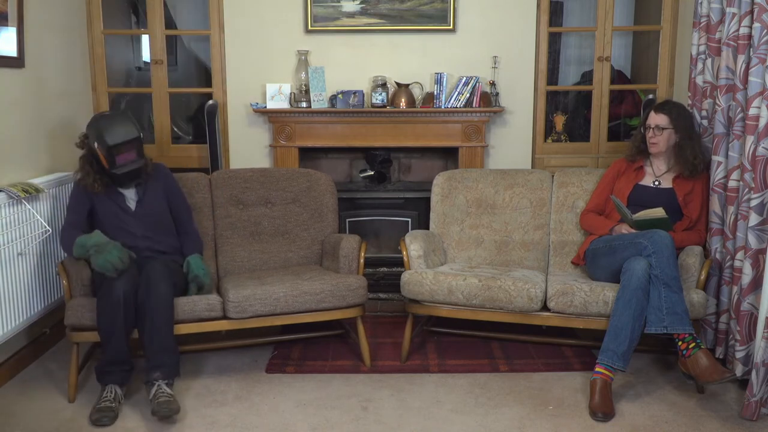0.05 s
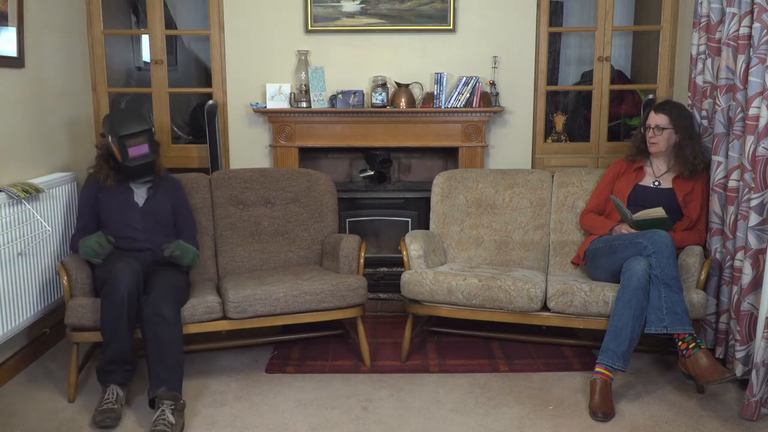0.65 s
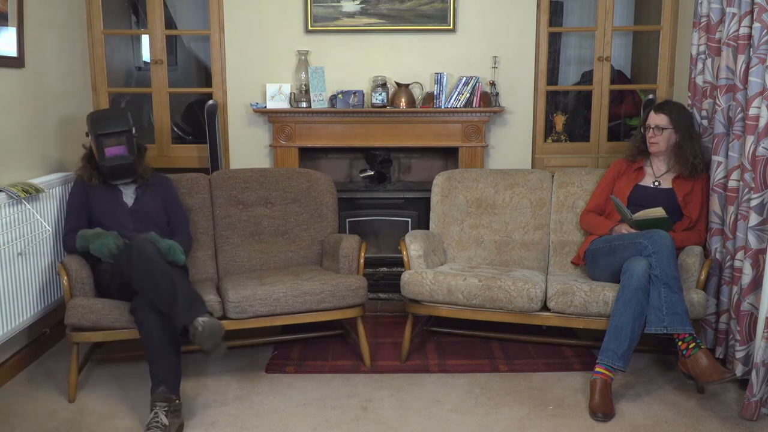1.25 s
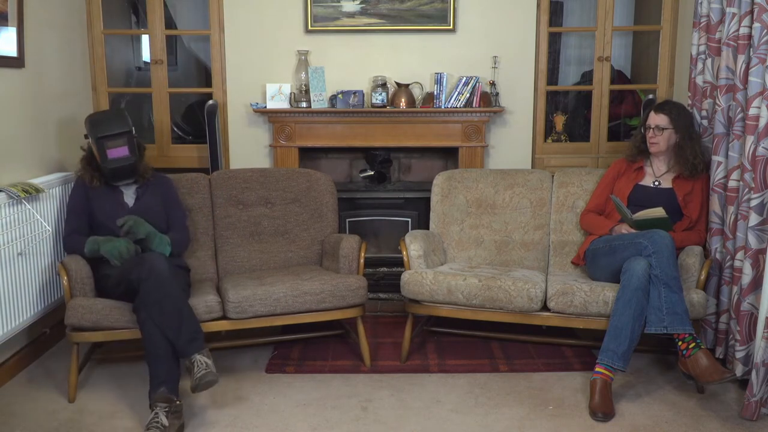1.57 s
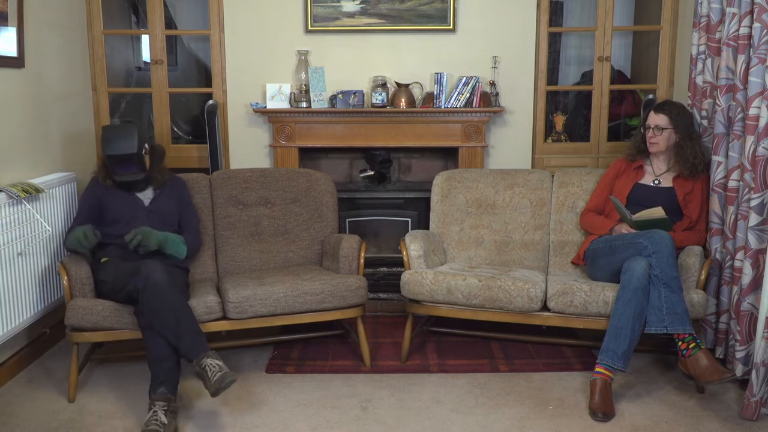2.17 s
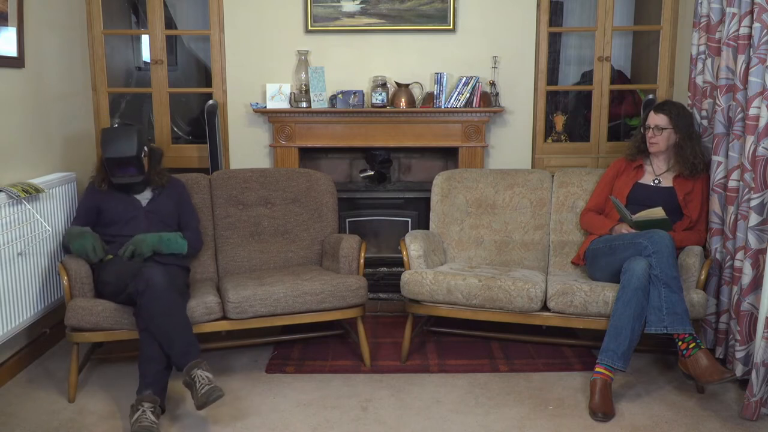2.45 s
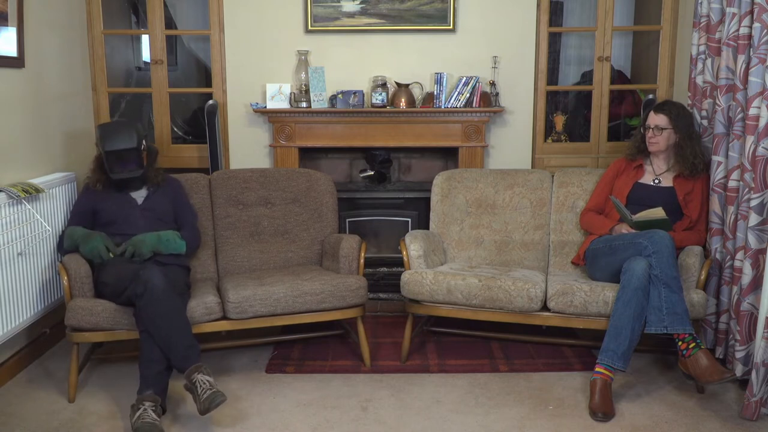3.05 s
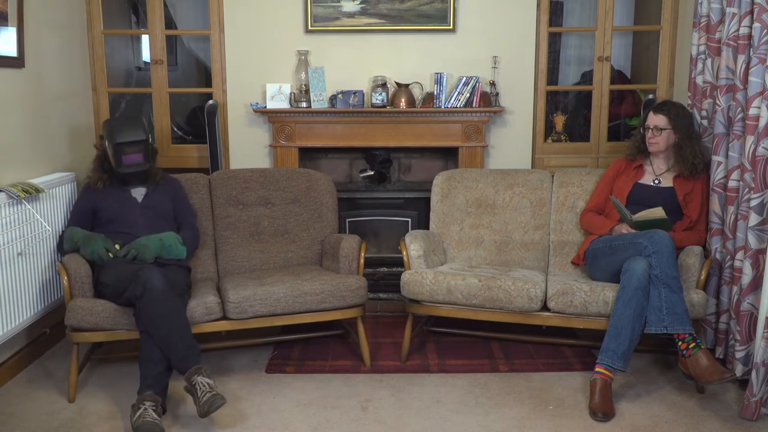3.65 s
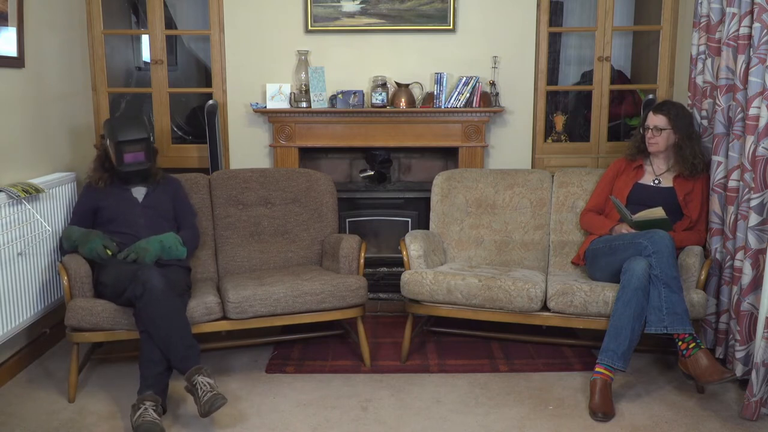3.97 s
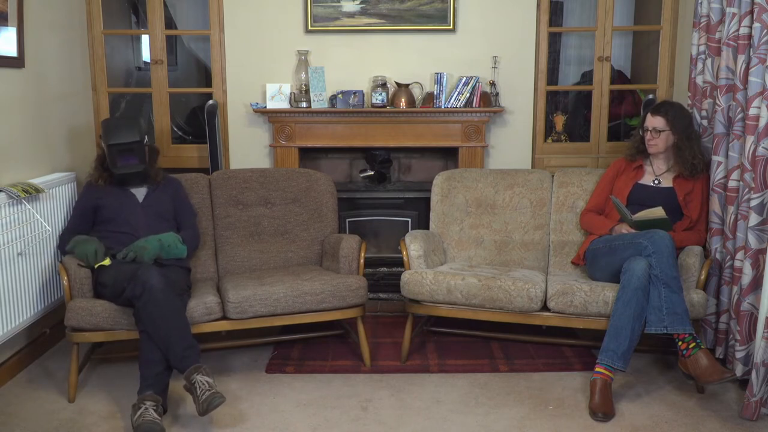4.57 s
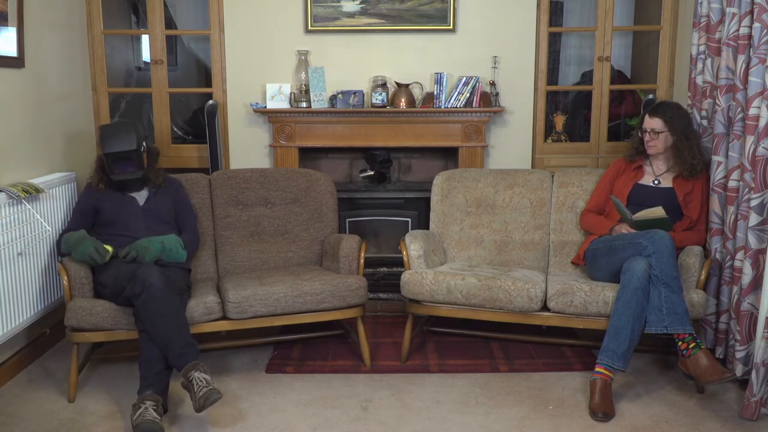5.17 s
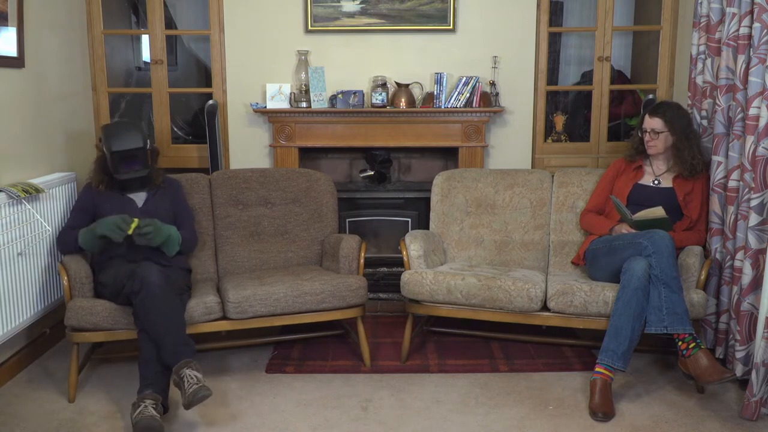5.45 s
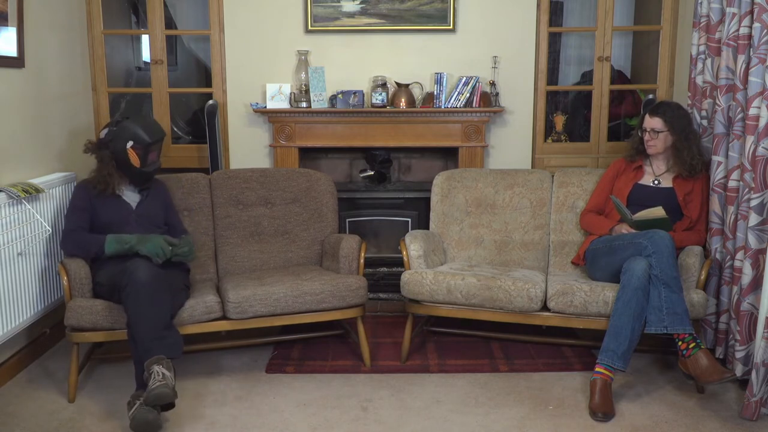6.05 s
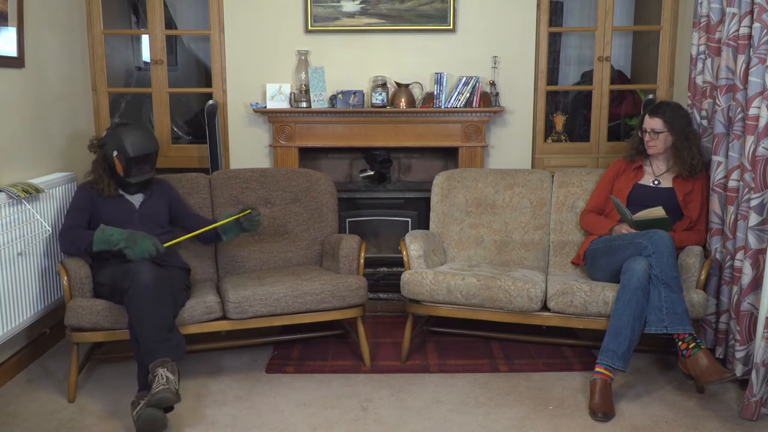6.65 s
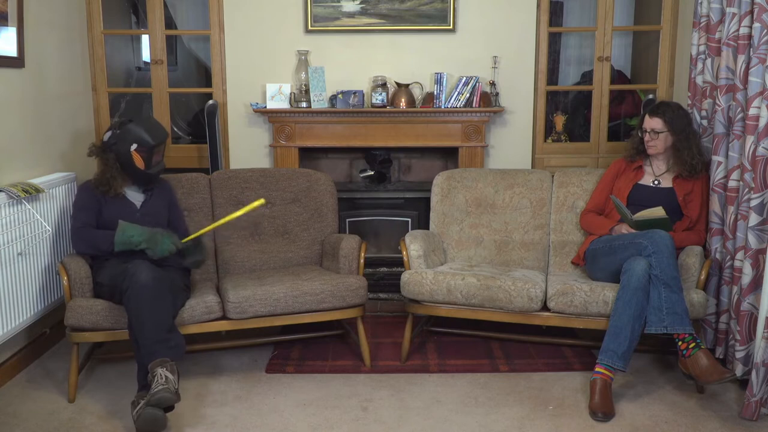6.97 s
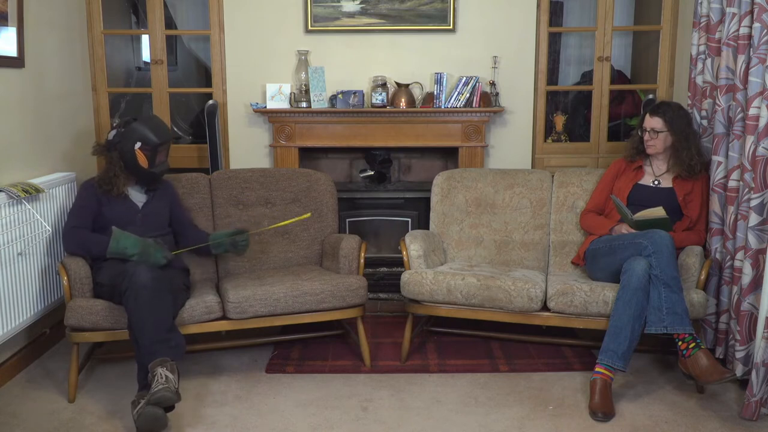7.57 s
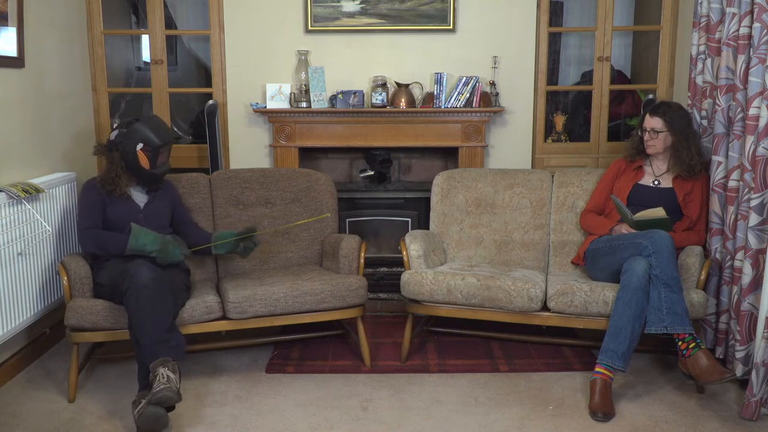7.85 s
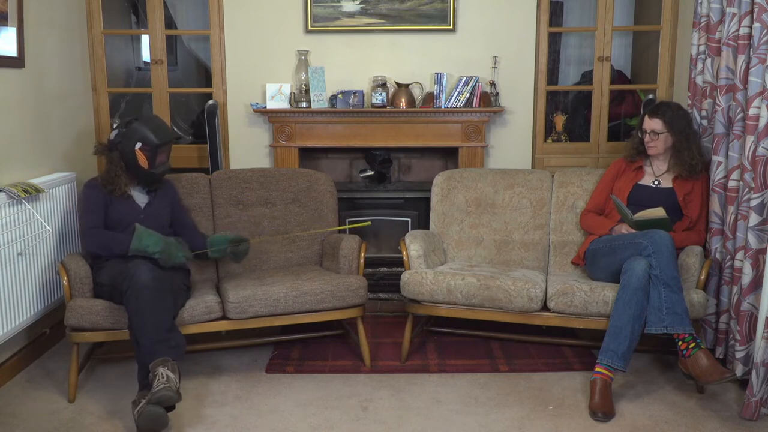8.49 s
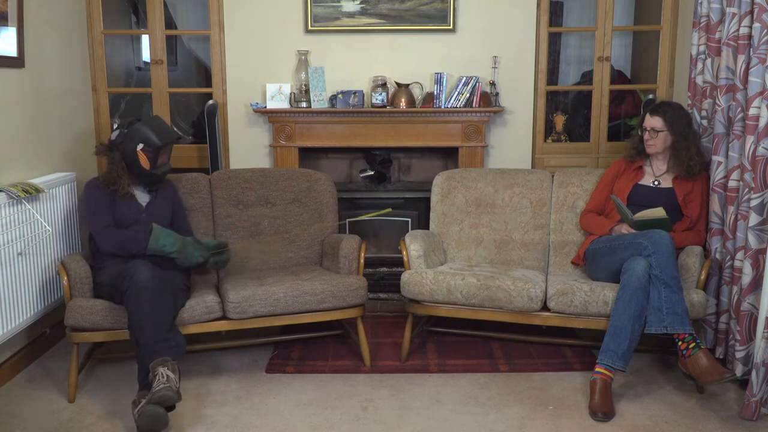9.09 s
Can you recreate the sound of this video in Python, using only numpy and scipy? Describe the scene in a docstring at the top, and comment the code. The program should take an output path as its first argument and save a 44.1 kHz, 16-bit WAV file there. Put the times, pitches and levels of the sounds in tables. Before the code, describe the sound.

Clothes swish softly as someone shifts on a sofa, and trouser legs slide over each other at about 1 second. From 2 seconds, thick leather gloves rub and creak on a tape measure, with padded bumps and light, hollow knocks of its case. At about 4.4 and 4.6 seconds the case clacks sharply twice, the first clack being the loudest sound. Smaller clicks, rubs and rustles follow. The steel blade then rasps through its slot in three short pulls, at roughly 6.3, 7.4 and 8.5 seconds, the first strongest and the last a little higher in pitch. From 6.7 seconds until just after 9, the extended blade gives bright, thin crinkles and ticks as it sags and buckles. The handling is on the right, with only a trace on the left. The living room is quiet, with faint steady hiss and little echo.

```python
"""A quiet living room: someone in thick gloves shifts on a sofa and fumbles with a tape measure.
Cloth swishes, leather sticks and slips, hands and legs bump. The hollow case knocks and clacks
twice, loudly. Then the steel blade rasps through its slot in three pulls, crinkling as it sags
and buckles. The handling is on the right; the left has faint room noise and a trace of it."""
import sys
import numpy as np
from scipy import signal
from scipy.fft import rfft, irfft
from scipy.io import wavfile
from scipy.ndimage import uniform_filter1d

SR = 44100
rng = np.random.default_rng(int(sys.argv[2]) if len(sys.argv) > 2 else 0)


def dump(signal):
    """Clip the signal to [-1, 1] and save it as 16-bit WAV at the path in sys.argv[1]."""
    limited = np.clip(np.atleast_2d(signal).T, -1, 1)
    pcm = np.round(limited * 32767).astype(np.int16)
    wavfile.write(sys.argv[1], SR, pcm)


N = 411012
TIME_S = np.arange(N) / SR

# Levels are relative: each source adds its own gain.
# noise floor spectra: f/Hz, gain/dB
LEFT_FLOOR = [(20, 3), (120, -1.5), (400, -2), (1000, -8), (4000, -15.5), (15000, -16)]
RIGHT_FLOOR = [(20, -9), (100, -1), (200, -4.5), (500, -2), (1400, -12), (3000, -12), (8000, -14),
               (15000, -17.5)]
# sleeve and trouser moves: t/s, rise/s, fall/s, level/dB, brightness/dB
SWISHES = [(0, .01, .11, -50, -1), (.02, .1, .35, -56, 1.5), (.2, .3, .5, -58, 3),
           (.72, .18, .22, -52, 2.5), (.92, .22, .27, -51, 6), (1.3, .12, .15, -58.5, 4),
           (.53, .07, .12, -55.5, 0), (1.5, .14, .42, -60, 3), (1.93, 0.2, 0.58, -56, 1.5),
           (2.9, 0.2, 0.13, -58.5, 6), (3.3, 0.27, 0.36, -68.5, 10.5), (3.84, 0.18, 0.25, -63, 11),
           (4.62, 0.21, 0.3, -59, 8), (4.98, 0.21, 0.45, -59.5, 5), (5.45, 0.42, .34, -55, 3),
           (6.03, 0.11, 0.49, -52.5, 5)]
# friction spectra of fabric, leather, blade in slot: f/Hz, gain/dB
CLOTH_COLOUR = [(100, -8), (200, -3.5), (320, 2.5), (700, 4), (1400, 1.5), (3000, -4), (6000, -7.5),
                (9000, -11), (15000, -24)]
GRIP_COLOUR = [(120, -24), (220, -10), (330, 6), (450, -7.5), (600, -2), (800, -8), (1050, -7), (1350, -1),
               (1800, -17), (4000, -19), (15000, -26)]
PULL_COLOUR = [(200, -20), (600, -11), (950, -9.5), (1300, -4.5), (1900, -4.5), (3100, -2.5), (4300, -2.5),
               (6500, -7), (8400, -8.5), (11000, -14.5), (15000, -26)]
# constant glove creak, fading once one hand lets go: t/s, level/dB
HOLD_CREAK = [(0, -70), (6.4, -66), (6.7, -69.5), (9.32, -79.5)]
# glove slides on the case: t/s, rise/s, fall/s, level/dB, crackle/dB
RUBS = [(0.83, 0.058, 0.11, -55, -68), (1.947, 0.026, 0.038, -49.5, -54), (2.445, 0.074, 0.067, -50.5, -55),
        (2.63, 0.16, 0.088, -63, -54.5), (3.56, 0.073, 0.033, -52, -51.5), (3.94, 0.065, 0.16, -55, -59),
        (4.849, 0.032, 0.049, -59, -47.5), (5.19, 0.064, 0.12, -58, -70), (5.071, 0.059, 0.037, -57.5, -56),
        (5.559, 0.035, 0.051, -52, -56)]
# spectrum of steel ticks: f/Hz, gain/dB
STEEL_COLOUR = [(150, -30), (500, -10.5), (2000, -8), (4500, -2), (7000, -1), (8600, -1), (10400, -4.5),
                (13500, -7), (15500, -15.5)]
# legs crossing: t/s, rise/s, fall/s, level/dB
LEG_SLIDE = (.88, .19, .16, -60)
# note of the trouser weave: t/s, f/Hz
WEAVE_PITCH = [(.93, 830), (1.07, 1130), (1.15, 1950)]
# hands and legs on case, lap and sofa: t/s, level/dB, f/Hz
BUMPS = [(1.056, -47, 368), (1.446, -47.5, 380), (1.988, -43, 343), (2.487, -39.5, 1360),
         (2.799, -42.5, 766), (3.034, -42, 1270), (3.404, -42, 345), (4.917, -40, 362), (5.271, -40, 375),
         (5.35, -44.5, 630), (6.03, -38, 377), (6.089, -44, 1010), (6.131, -42.5, 1315), (6.175, -40, 556),
         (6.431, -45, 1380), (7.156, -52.5, 571), (7.276, -48, 566), (7.498, -45, 335), (7.879, -48.5, 410)]
# case contacts: t/s, thud/dB, snap/dB, tink/dB, base decay/s
KNOCKS = [(1.927,-47.5,-55.5,-72,0.0045),(1.9752,-49,-49,-55,0.01),(2.185,-46,-53,-55.5,0.0042),(2.54,-44.5,-64,-61,0.012),(2.565,-49,-51,-58,0.004),(2.814,-47,-52.5,-54,0.0024),(3.032,-53,-56,-61,0.013),(3.404,-57,-46.5,-53.5,0.0031),(3.432,-55.5,-52,-58,0.0015),(4.0428,-43,-52,-63,0.0011),(4.098,-57,-38,-44,0.0028),(4.3578,-35.5,-35,-37,0.017),(4.3882,-39,-36,-41.5,0.0049),(4.414,-37,-47,-66,0.0046),(4.4292,-30,-29,-29,0.0012),(4.4315,-23.5,-21,-14,0.00059),(4.4322,-25,-13.5,-19.5,0.0013),(4.55,-39.5,-36,-49,0.005),(4.5576,-33,-35,-39,0.023),(4.58,-26,-22,-25.5,0.0034),(4.592,-35,-34,-50,0.0035),(4.614,-46,-43,-63,0.0028),(4.674,-44,-62,-70,0.002),(4.819,-49,-49.5,-56,0.02),(4.886,-47.5,-62,-40.5,0.0037),(4.941,-56,-44.5,-69,0.0057),(4.946,-39.5,-48,-58,0.001),(5.274,-51.5,-67,-67,0.0018),(5.4934,-45,-50,-58,0.0032),(5.4983,-56,-49.5,-67,0.0036),(5.5956,-46,-43,-52,0.017),(5.6091,-49,-39,-51,0.0046),(6.0307,-51.5,-42.5,-43.5,0.0023),(6.2065,-58,-44,-47.5,0.0037),(6.2888,-49,-33.5,-40.5,0.0027),(7.2658,-49.5,-41,-51,0.0026),(8.2696,-49,-33,-35.5,0.00071)]
# spectra of a contact's three parts: f/Hz, gain/dB
THUD_COLOUR = [(70, -22.5), (210, -17), (340, -3), (450, -4.5), (590, -2.5), (850, -4.5), (1300, -5),
               (1800, -12.5), (4000, -44)]
SNAP_COLOUR = [(200, -49.5), (600, -25), (1200, -7), (1650, -4), (2900, -0.5), (4200, -0.5), (5200, -1.5),
               (6200, -8), (8000, -30.5)]
TINK_COLOUR = [(3500, -37), (6200, -4), (8500, 4), (10500, -5), (13000, -5), (16000, -17.5)]
# resonances of case and coil: f/Hz, width/Hz, gain/dB
CASE_MODES = [(1360, 130, 4), (2700, 290, 2.5), (3200, 280, -1.5), (5300, 350, -6), (8400, 180, -0.5)]
# contacts that ring the case: t/s, level/dB, f/Hz, decay/s
PINGS = [(2.541, -45, 616, .019), (4.097, -42, 3130, .004), (6.0315, -44, 4020, .0016),
         (4.4316, -14.5, 3000, .0012), (4.436, -31, 578, .012), (4.5795, -31, 3980, .002),
         (4.586, -34, 780, .005), (8.2692, -47, 563, .011)]
# tugs making up the three pulls: t/s, rise/s, fall/s, level/dB
TUGS = [(6.03, .35, .1, -48.5), (6.23, .072, .086, -54), (6.35, .095, .11, -39), (6.424, .009, .016, -38.5),
        (7.3, .13, .1, -45.5), (7.43, .055, .1, -44.5), (7.55, .045, .25, -54.5), (8.33, .18, .15, -47),
        (8.55, .074, .1, -54)]
# coil rasp, rising as the case empties: t/s, f/Hz
RASP_PITCH = [(6.45, 3200), (7.49, 3400), (8.6, 4730)]
# buckles of the free blade: t/s, level/dB, decay/s, ring f/Hz
FLICKS = [(6.7428, -33.5, .0045, 8560), (6.7836, -44.5, .014, 8940), (6.8697, -38, .005, 9400),
          (7.0484, -54, .0068, 8200), (7.066, -52, 0.022, 9660), (7.1543, -36.5, 0.0064, 8100),
          (7.203, -47, .01, 7800), (7.21, -44, 0.011, 9000), (7.2792, -36, .0077, 9800),
          (7.344, -49.5, .005, 7500), (7.385, -45.5, .0025, 8500), (7.4, -44.5, 0.007, 6200),
          (7.4156, -43.5, 0.0088, 6900), (7.534, -53, .0089, 9200), (7.599, -45.5, .0052, 9000),
          (7.624, -53.5, 0.0044, 8400), (7.662, -55, .0045, 8900), (7.724, -51, .01, 6900),
          (7.789, -46, 0.022, 8050), (7.811, -47, 0.016, 7360), (7.888, -55, 0.0038, 7700),
          (8.103, -50.5, 0.016, 6830), (8.142, -49.5, 0.023, 9330), (8.172, -54, .0073, 9600),
          (8.2385, -46.5, 0.018, 8400), (8.263, -43.5, 0.028, 7350), (8.289, -40.5, .014, 8400),
          (8.444, -48, .0058, 8800), (8.474, -41.5, 0.027, 9400), (8.629, -45, 0.025, 8100),
          (8.775, -55, .005, 9200), (8.9217, -57, .0073, 7160), (9.053, -53, .005, 8400),
          (9.154, -45.5, 0.016, 8400), (9.179, -51.5, .0079, 7740), (9.223, -44, .0054, 8600),
          (9.2431, -45, 0.005, 8100), (9.267, -51, 0.0051, 9000)]
# free blade resonances: ratio to ring f, width/Hz, gain/dB
BLADE_MODES = [(1, 1300, 0), (1.45, 1500, -2)]
# trembling of the hanging blade: t/s, rise/s, fall/s, level/dB
TREMBLE = (8.6, .4, .6, -67)
# room decay: f/Hz, T60/s
ROOM_T60 = [(200, 0.36), (530, 0.37), (1400, 0.16), (3700, 0.23), (9700, 0.3), (16000, 0.2)]
# room tail against direct sound: f/Hz, level/dB
ROOM_WET = [(100, -5), (500, -6), (1400, -4.5), (3500, -6), (7000, -11), (15000, -14.5)]


def amp(db):
    return 10 ** (np.asarray(db) / 20)


def unit_rms(x):
    return x / np.sqrt(np.mean(x ** 2) + 1e-20)


def at_level(x, db):
    """Scale to the energy of 10 ms at this level."""
    return amp(db) * x / np.linalg.norm(x) * np.sqrt(SR / 100)


def power_sum(gains):
    return np.sqrt(sum(gain ** 2 for gain in gains))


def log_interp(points, hz):
    knots_hz, values = np.transpose(points)
    return np.interp(np.log(hz + 1), np.log(knots_hz + 1), values)


def add(mix, start_s, sound):
    part = mix[round(start_s * SR):][:len(sound)]
    part += sound[:len(part)]


def colour(x, spectrum, size=2048):
    """Minimum-phase filter."""
    log_gain = np.log(amp(log_interp(spectrum, abs(np.fft.fftfreq(size, 1 / SR)))))
    taps = np.fft.ifft(np.exp(np.conj(signal.hilbert(log_gain)))).real
    return signal.oaconvolve(x, taps[:size // 2])[:len(x)]


def resonate(x, hz, width_hz):
    return signal.lfilter(*signal.iirpeak(hz, hz / width_hz, SR), x)


def ring(x, modes, ring_db):
    """Input plus the modes it excites."""
    tones = sum(amp(db) * resonate(x, hz, width_hz) for hz, width_hz, db in modes)
    return x + amp(ring_db) * tones


def wander(rate_hz):
    """Smooth random motion, rms 1."""
    t = np.arange(0, TIME_S[-1] + 1, 1 / 400)
    lowpass = np.exp(-(np.fft.rfftfreq(len(t), t[1]) / rate_hz) ** 2)
    slow = irfft(rfft(rng.standard_normal(len(t))) * lowpass, len(t))
    return np.interp(TIME_S, t, unit_rms(slow))


def glide(x, pitch, width_hz, waver):
    """Resonance wavering about a pitch curve, rms 1."""
    hz = np.interp(TIME_S, *np.transpose(pitch)) * (1 + waver * wander(rate_hz=30))
    carrier = np.exp(2j * np.pi * np.cumsum(hz) / SR)
    lowpass = signal.butter(2, width_hz / 2, fs=SR, output="sos")
    return unit_rms((carrier * signal.sosfilt(lowpass, x / carrier)).real)


def stroke(start_s, rise_s, fall_s, db, power=0.94):
    """Gain of one movement: speeds up, peaks, stops."""
    speed = np.interp(TIME_S, [start_s, start_s + rise_s, start_s + rise_s + fall_s], [0, 1, 0])
    return amp(db) * np.sin(np.pi / 2 * speed) ** power


def pulse(size, rise_s, decay_s):
    """Linear rise, exponential decay."""
    t = TIME_S[:size]
    return np.minimum(t / rise_s, np.exp((rise_s - t) / decay_s))


def friction(slips_per_s, spread_db, slip_share, pressure_db, pressure_hz):
    """Hiss and tiny slips under unsteady pressure."""
    sizes = amp(spread_db * np.minimum(rng.exponential(1, N), 4))
    slips = sizes * rng.choice([-1, 1], N) * (rng.random(N) < slips_per_s / SR)
    drive = np.sqrt(slip_share) * unit_rms(slips) + np.sqrt(1 - slip_share) * rng.standard_normal(N)
    return drive * amp(pressure_db * wander(pressure_hz))


def chatter(decay_s, first_touch, size=4096):
    """One contact: sharp first touch, then dying micro-impacts; whitened."""
    fade = np.exp(-TIME_S[:size] / decay_s)
    burst = rng.standard_normal(size) * fade
    burst[0] = first_touch * np.linalg.norm(burst)
    spectrum = rfft(burst)
    smooth_power = uniform_filter1d(abs(spectrum) ** 2, 70)
    return irfft(spectrum / np.sqrt(smooth_power + 1e-12)) * fade ** .1


def background(spectrum, db):
    """Steady room air and electronic hiss."""
    return amp(db) * unit_rms(colour(rng.standard_normal(N), spectrum))


def clothes(gain_db=-1.5, split_hz=1800):
    """Fine-grained fabric swish; each move has its own brightness."""
    drive = friction(slips_per_s=1300, spread_db=1.5, slip_share=0.25, pressure_db=1.3, pressure_hz=29)
    swish = unit_rms(colour(drive, CLOTH_COLOUR))
    dull = signal.sosfiltfilt(signal.butter(2, split_hz, fs=SR, output="sos"), swish)
    moves = [(stroke(*move, power=1.3), amp(bright_db)) for *move, bright_db in SWISHES]
    low_gain = power_sum(gain / tilt for gain, tilt in moves)
    high_gain = power_sum(gain * tilt for gain, tilt in moves)
    return amp(gain_db) * (low_gain * dull + high_gain * (swish - dull))


def gloves(grip_db=-4, nap_db=1):
    """Leather sticks and slips on the case, dull and lumpy; its nap hisses."""
    grip = friction(slips_per_s=280, spread_db=5.5, slip_share=0.85, pressure_db=2.5, pressure_hz=40)
    nap = friction(slips_per_s=1200, spread_db=2, slip_share=0.43, pressure_db=2, pressure_hz=18)
    slide = power_sum(stroke(*rub) for *rub, _ in RUBS)
    hold = amp(np.interp(TIME_S, *np.transpose(HOLD_CREAK)))
    creak = power_sum([amp(grip_db) * slide, hold]) * unit_rms(colour(grip, GRIP_COLOUR))
    brush = power_sum([amp(nap_db) * slide, hold]) * unit_rms(colour(nap, CLOTH_COLOUR))
    return creak + brush


def crackle(glove_db=-2, running_db=-51, full_effort_db=-49, shiver_db=-14):
    """Bright ticks: under a sliding glove, along the running blade, in the shiver after a flick."""
    drive = friction(slips_per_s=600, spread_db=5, slip_share=0.15, pressure_db=0, pressure_hz=58)
    rubbed = power_sum(stroke(*timing, db + glove_db) for *timing, _, db in RUBS)
    running = amp(running_db) * np.tanh(pull_effort() / amp(full_effort_db))
    shiver_power = np.zeros(N)
    for start_s, db, *_ in FLICKS:
        add(shiver_power, start_s, (amp(db) * pulse(SR // 2, rise_s=0.013, decay_s=0.038)) ** 2)
    shiver = amp(shiver_db) * np.sqrt(shiver_power)
    return power_sum([rubbed, running, shiver]) * unit_rms(colour(drive, STEEL_COLOUR))


def trousers():
    """Leg slides over leg; the weave's note glides upward through the slide."""
    return stroke(*LEG_SLIDE) * glide(rng.standard_normal(N), WEAVE_PITCH, width_hz=300, waver=.03)


def bumps(gain_db=-7, puff_db=-4, width_hz=110, size=8192):
    """Padded contacts: hollow note and dull puff, no click."""
    out = np.zeros(N)
    push = pulse(size, rise_s=.005, decay_s=.01)
    for start_s, db, hz in BUMPS:
        noise = rng.standard_normal(size)
        hollow = unit_rms(resonate(np.tile(noise, 2), hz, width_hz)[size:])  # settled half
        puff = amp(puff_db) * unit_rms(colour(noise, GRIP_COLOUR))
        add(out, start_s, at_level(push * (hollow + puff), db + gain_db))
    return out


def knocks(thud_trim_db=-1, thud_extra_s=0.0072):
    """Case contacts: hollow thud, plastic snap, metallic tink."""
    out = np.zeros(N)
    for start_s, thud_db, snap_db, tink_db, decay_s in KNOCKS:
        hard = chatter(1.2 * decay_s, first_touch=0.56)
        soft = chatter(decay_s + thud_extra_s, first_touch=0.16)
        thud = at_level(colour(soft, THUD_COLOUR), thud_db + thud_trim_db)
        snap = at_level(ring(colour(hard, SNAP_COLOUR), CASE_MODES, ring_db=-8.5), snap_db)
        tink = at_level(colour(hard, TINK_COLOUR), tink_db)
        add(out, start_s, thud + snap + tink)
    return out


def pings():
    """One case note rings briefly, set by where it is struck."""
    out, t = np.zeros(N), TIME_S[:SR // 4]
    for start_s, db, hz, decay_s in PINGS:
        add(out, start_s, at_level(np.cos(2 * np.pi * hz * t) * np.exp(-t / decay_s), db))
    return out


def pull_effort():
    """How hard the blade is drawn."""
    return power_sum(stroke(*tug, power=1.6) for tug in TUGS)


def blade_pull(gain_db=-5, hard_pull_db=-38, case_db=3, rasp_db=-2):
    """Stick-slip in the slot; harder pulls rasp the coil and ring the case more."""
    drive = friction(slips_per_s=560, spread_db=2, slip_share=0.65, pressure_db=2.2, pressure_hz=75)
    effort = pull_effort()
    force = np.minimum(effort / amp(hard_pull_db), 1)
    ring_db = case_db + 20 * np.log10(force ** 2 + 1e-9)
    scrape = ring(unit_rms(colour(drive, PULL_COLOUR)), CASE_MODES, ring_db)
    rasp = amp(rasp_db) * force ** 1.2 * glide(drive, RASP_PITCH, width_hz=720, waver=.015)
    return amp(gain_db) * effort * (scrape + rasp)


def flicks(first_treble_db=8, dulling_db_per_s=3.2, shelf_hz=(7000, 12200),
           firm_rise_s=.0009, firm_db=-37):
    """The curved strip pops through: a bright splash, its ring set by the bend."""
    out = np.zeros(N)
    for start_s, db, decay_s, hz in FLICKS:
        rise_s = firm_rise_s * amp(firm_db - db)  # weaker: softer onset
        burst = chatter(decay_s, first_touch=0.15)
        onset = np.minimum(TIME_S[:len(burst)] / rise_s, 1)
        splash = colour(burst * onset, STEEL_COLOUR)
        treble_db = first_treble_db - dulling_db_per_s * (start_s - FLICKS[0][0])  # longer blade: duller
        splash = colour(splash, [(shelf_hz[0], 0), (shelf_hz[1], treble_db)])
        modes = [(ratio * hz, width_hz, mode_db) for ratio, width_hz, mode_db in BLADE_MODES]
        add(out, start_s - rise_s / 2, at_level(ring(splash, modes, ring_db=-2), db))
    return out


def tremble(ticks_per_s=30, spread_db=-0.5):
    """The sagging strip ticks faintly at random."""
    sizes = amp(spread_db * np.minimum(rng.exponential(1, N), 3))
    impulses = sizes * (rng.random(N) < ticks_per_s / SR)
    ticks = signal.oaconvolve(impulses, chatter(decay_s=0.0076, first_touch=0.42))[:N]
    return stroke(*TREMBLE, power=0.54) * unit_rms(colour(ticks, STEEL_COLOUR))


def flex(x, patch_db):
    """As the strip bends, its resonances come and go in spectral patches."""
    frames = dict(fs=SR, nperseg=512, noverlap=384)
    spectra = signal.stft(x, **frames)[2]
    patch_shape = np.outer(np.hanning(7), np.hanning(30))  # bins by frames
    patches = unit_rms(signal.oaconvolve(rng.standard_normal(spectra.shape), patch_shape, "same"))
    return signal.istft(spectra * unit_rms(amp(patch_db * patches)), **frames)[1][:N]


def reflections(x, gap_s=0.0035):
    """Short scattered tail of a furnished room, drawn anew per call."""
    taps = rng.standard_normal(SR // 2)
    taps[:int(gap_s * SR)] = 0
    hz, t, spectra = signal.stft(taps, SR, nperseg=256)
    fade = amp(-60 * t / log_interp(ROOM_T60, hz)[:, None])
    fade *= amp(log_interp(ROOM_WET, hz))[:, None] / np.sqrt(np.mean(fade ** 2, axis=1, keepdims=True))
    tail = signal.istft(spectra * fade, SR, nperseg=256)[1] / np.linalg.norm(taps)
    return signal.oaconvolve(x, tail)[:N]


def room(x):
    """Moving hands shift the reflections: two tails crossfade."""
    shares = [np.cos(2 * np.pi * TIME_S + phase) for phase in (0, np.pi / 2)]
    return x + sum(reflections(x * share) for share in shares)


def knocks_in_room(directions=3):
    """The case radiates a different chatter each way; the walls blend them."""
    return knocks() + sum(reflections(knocks()) for _ in range(directions)) / np.sqrt(directions)


def scene():
    """Handling on the right, a trace leaking left."""
    steel = flex(flicks() + crackle() + tremble(), patch_db=3.5) + flex(blade_pull(), patch_db=2.5)
    handling = knocks_in_room() + pings() + room(clothes() + trousers() + gloves() + bumps() + steel)
    left = background(LEFT_FLOOR, db=-73.5) + amp(-57.5) * handling
    right = background(RIGHT_FLOOR, db=-62) + handling
    return np.array([left, right])


def record(dry):
    """The loudest clack clips; then a low-pass."""
    cutoff_hz = 15950
    lowpass = signal.firwin(255, cutoff_hz, window=("kaiser", 8), fs=SR)
    return signal.oaconvolve(np.clip(dry, -1, 1), lowpass[None], "same")


dry = scene()
out = record(dry)
dump(out)
```